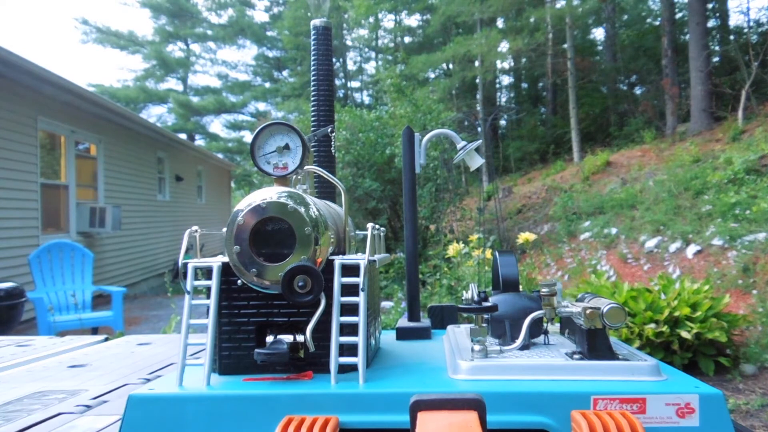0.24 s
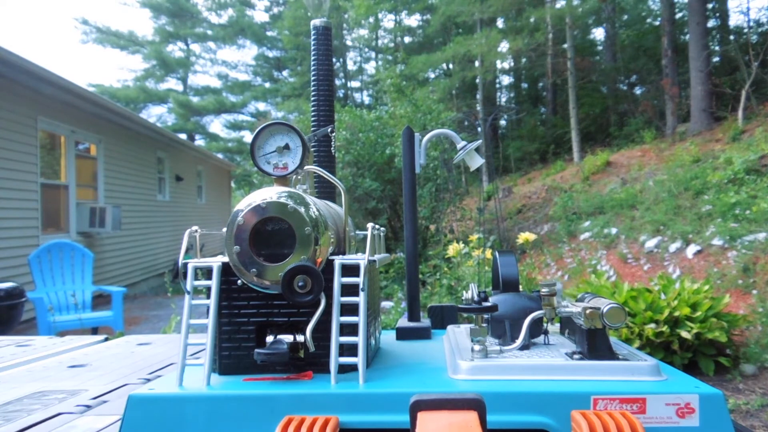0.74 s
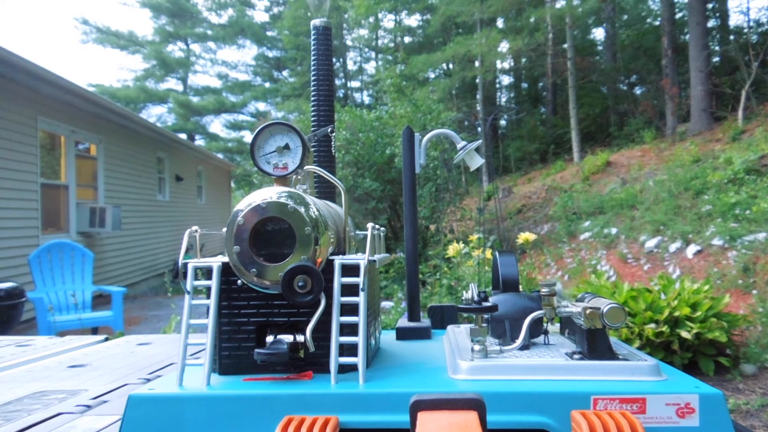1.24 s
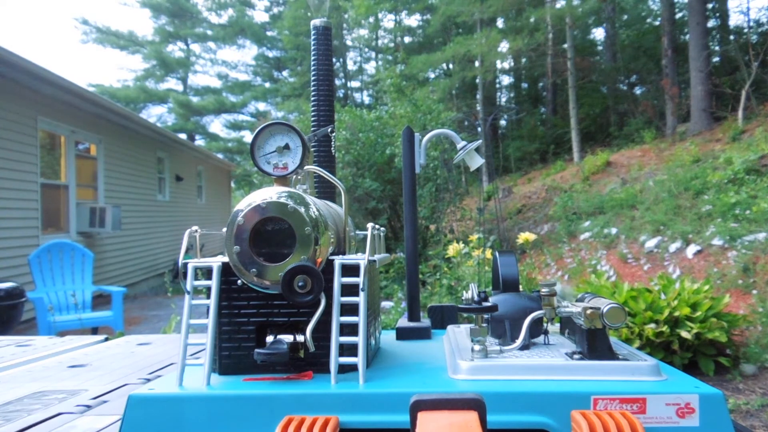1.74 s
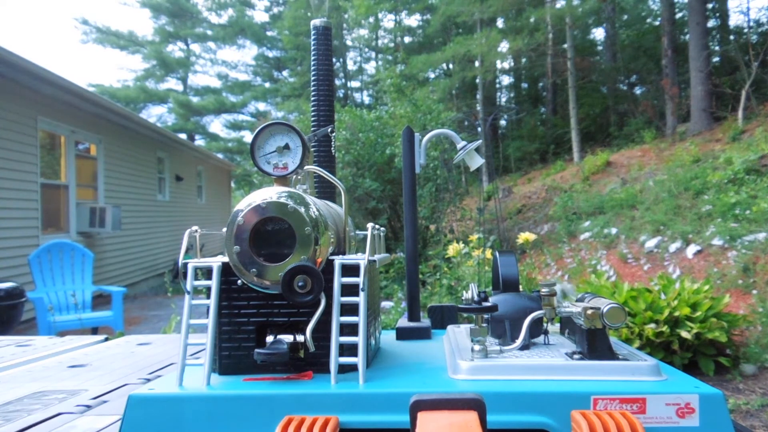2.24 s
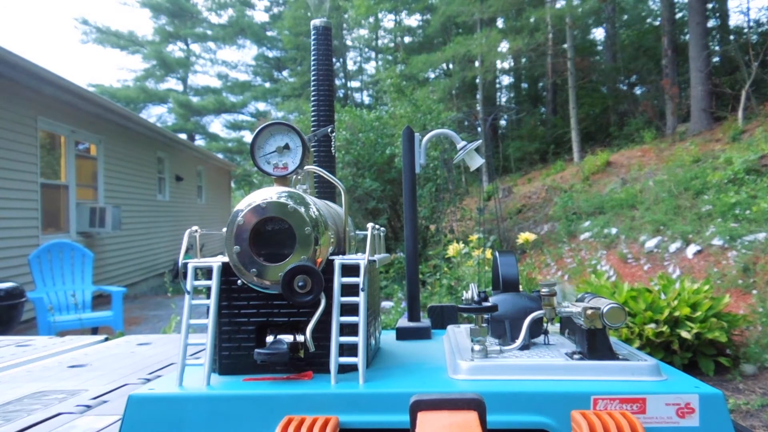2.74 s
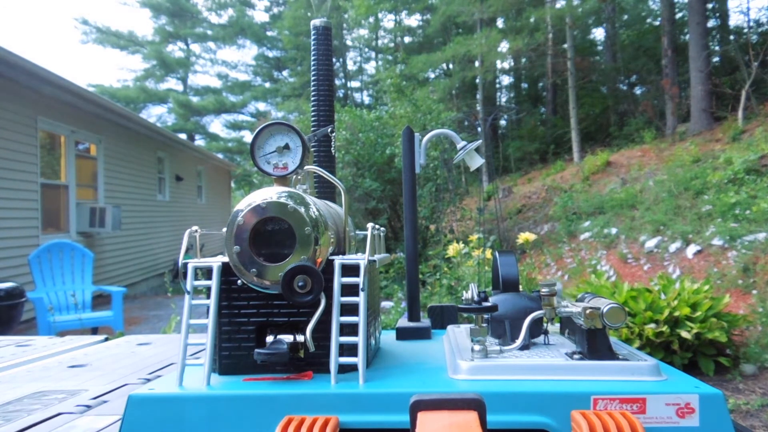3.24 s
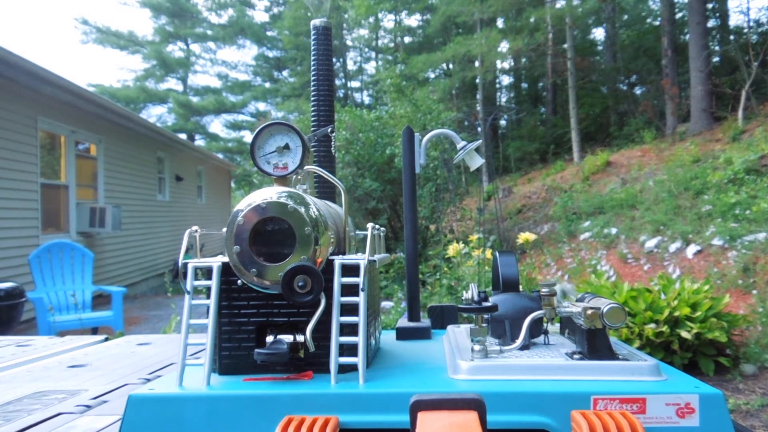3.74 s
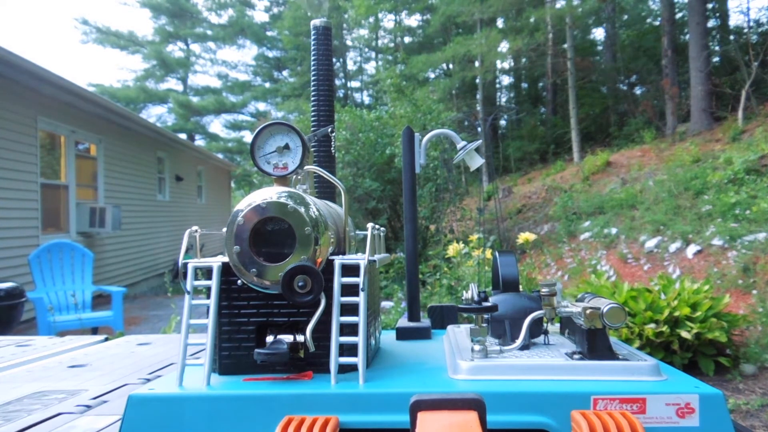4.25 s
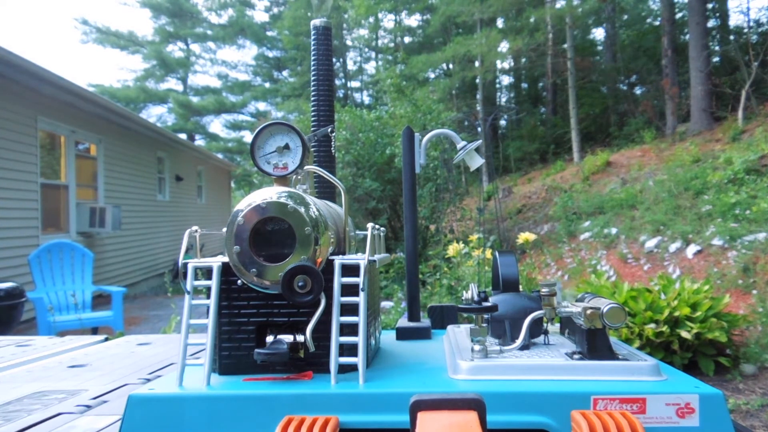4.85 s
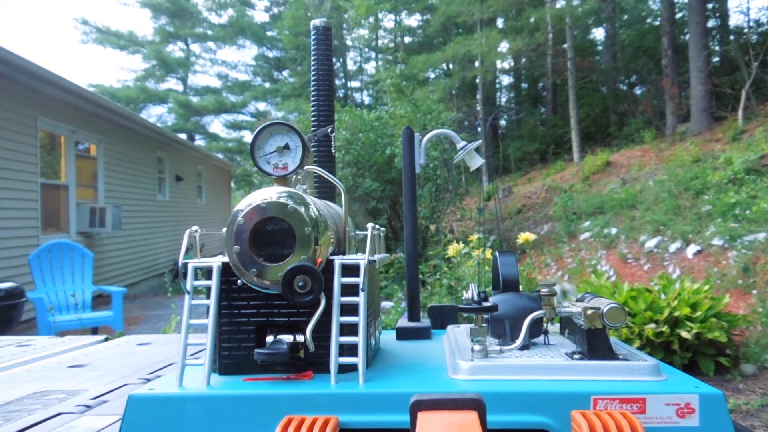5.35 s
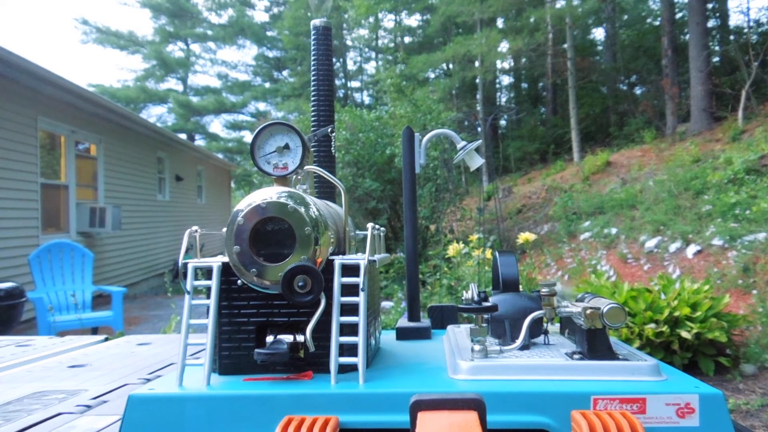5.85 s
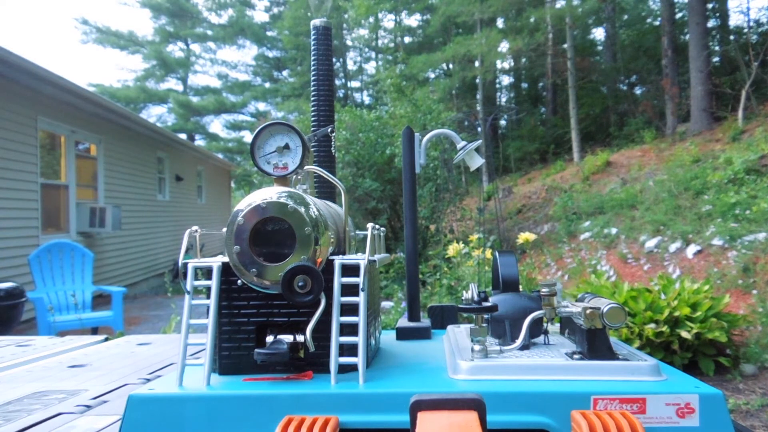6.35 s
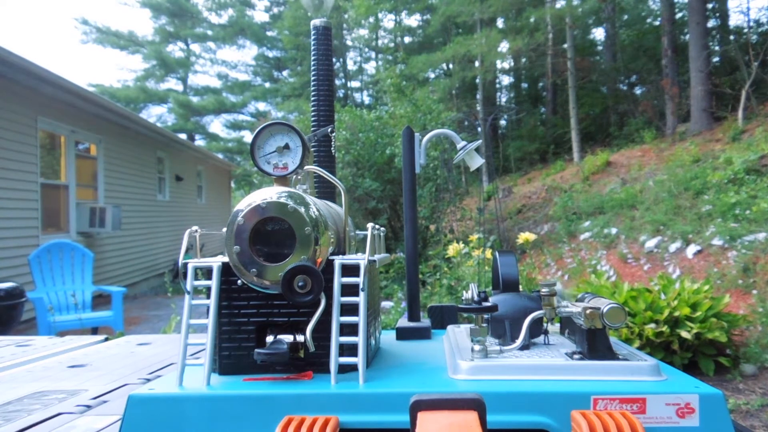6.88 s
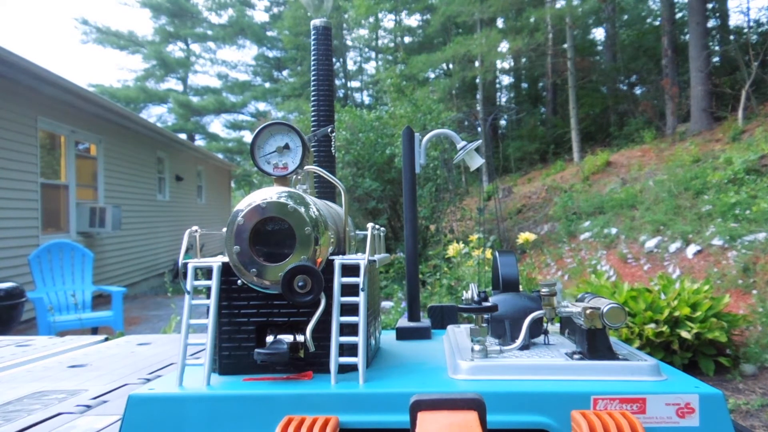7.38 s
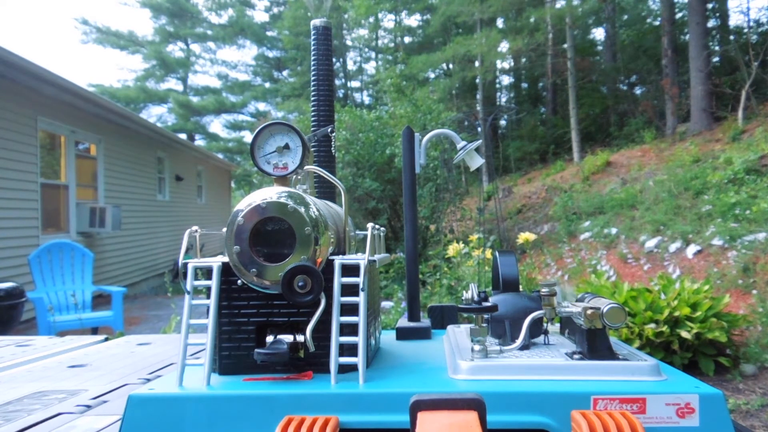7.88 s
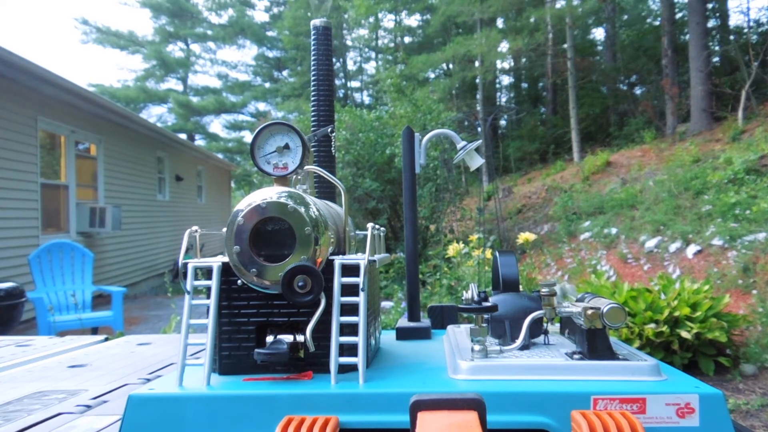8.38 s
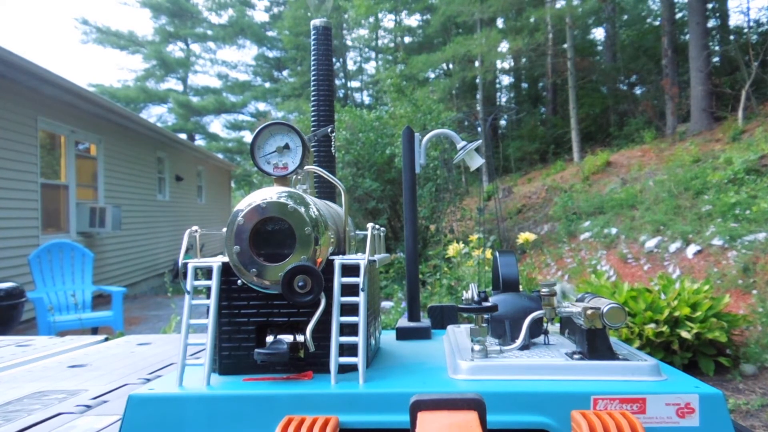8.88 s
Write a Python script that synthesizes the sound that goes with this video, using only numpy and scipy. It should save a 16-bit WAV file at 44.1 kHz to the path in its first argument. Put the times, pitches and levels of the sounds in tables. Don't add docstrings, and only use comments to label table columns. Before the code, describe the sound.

A small tabletop steam engine chatters rapidly outdoors, bright metal knocks over rattling linkage and steam hiss, slowing slightly and becoming uneven.

```python
import sys
import numpy as np
from scipy import signal
from scipy.fft import rfft, irfft, next_fast_len
from scipy.io import wavfile
from scipy.ndimage import uniform_filter1d

SR = 44100
rng = np.random.default_rng(int(sys.argv[2]) if len(sys.argv) > 2 else 0)


def master(y):
    cut = np.clip(np.atleast_2d(y).T, -1, 1)
    pcm = np.round(cut * 32767)
    wavfile.write(sys.argv[1], SR, pcm.astype(np.int16))


def rack_gain(trim_db):
    fader = np.asarray(trim_db, float)
    return 10 ** (fader / 20)


N = 402191

# time_s, speed_turns_per_s
SPEED = [(0, 18.039), (1.01, 17.789), (2.03, 17.634), (3.04, 17.338), (4.05, 17.001), (5.07, 16.692),
         (6.08, 16.497), (7.09, 16.463), (8.11, 16.329), (9.12, 16.231)]
MEAN_SPEED = 17
# pitch_hz, side_share
APART = [(30, .5), (130, .34), (400, .18), (1000, .055), (2000, .06), (4000, .1), (7000, .12), (9500, .4),
         (14000, .36)]


def crankshaft():
    first_turn = .232
    phase = np.cumsum(curve(SPEED, 1)) / SR - first_turn
    whole_turns = np.arange(int(phase[-1]) + 1)
    return phase, np.interp(whole_turns, phase, np.arange(N) / SR)


def contact(crank):
    # time_s, knock_db, treble_minus_knock_db, return_knock_db
    slack = np.array([(0, -27, 0, -41), (.5, -28, 1, -42.5), (1.35, -28.2, -.4, -39.5),
                      (1.7, -28, 0.5, -43), (2.3, -28.5, -1, -43), (2.8, -30, 2, -42.5), (3.3, -29, 1, -44),
                      (4.2, -29, 1.5, -40), (4.7, -28, -4, -44), (4.85, -32.5, -16, -43),
                      (5.1, -31.5, -4.5, -39.5), (5.25, -30, -3.5, -41), (5.95, -29, -2.5, -40),
                      (6.4, -29, 0, -41), (7.2, -27.5, -2, -40.5), (8.1, -28, 0, -39.5),
                      (8.7, -28.5, 1, -42.5), (9.12, -27.5, -0.5, -37)])
    # time_s, knock_db, treble_minus_knock_db
    cushioned = [(2.091, -28, -4.5), (2.148, -28.5, -2.5), (2.376, -28.5, -3), (3.006, -32.5, 1),
                 (3.064, -28, -10), (3.121, -31.5, -11), (3.18, -32.5, -12), (3.411, -32.5, -2.5),
                 (3.469, -32, -11), (3.527, -29.5, -13), (3.585, -30.5, -12), (3.644, -33, -2.5),
                 (3.702, -29, -12), (3.761, -33, -7), (3.82, -31.5, -8), (3.936, -31.5, -5),
                 (4.408, -35.5, -15), (4.468, -31, -4), (4.588, -37, -7), (5.482, -35, -2.5),
                 (5.543, -28.5, -14), (5.604, -30, -6), (5.664, -28.5, -4.5), (6.087, -31.5, -13),
                 (6.33, -28.5, -7), (6.39, -29.5, -3), (6.45, -34.5, -11), (8.586, -38, -16),
                 (8.647, -31, -13)]
    # time_s, knock_db, treble_minus_knock_db
    bare = [(.013, -32.5, 6.5), (.179, -28.5, 2), (.681, -28.5, 1.5), (2.204, -29, 3.5), (2.261, -29, 3),
            (2.546, -28.5, 2.5), (2.661, -28, 0.5), (2.719, -29.5, 3.5), (2.834, -27, 4), (2.891, -26, 3.5),
            (2.949, -27, 2), (3.238, -30, 1.5), (3.878, -27.5, 0.5), (3.994, -28, -0.5), (4.527, -27, -2.5),
            (4.645, -29.5, -1.5), (5.362, -30, -1), (5.423, -27, -3), (5.725, -29.5, 0), (6.149, -28, -.2),
            (6.269, -28, -1), (7.728, -29, 2), (7.85, -28.4, 2), (8.525, -27.5, 2)]
    trend = np.array([np.interp(crank, slack[:, 0], column) for column in slack.T[1:]])
    scatter_db = [.5, .9, 1.1]
    db = trend + (rng.standard_normal((len(crank), 3)) * scatter_db).T
    for s, knock_db, treble_db in cushioned + bare:
        db[:2, np.argmin(abs(crank - s))] = knock_db, treble_db
    db[2] += 0.35 * (db[0] - trend[0])
    return db


def main_knock(start, knock_db, treble_db):
    # pitch_hz, level_db, t60_s, build_up_ms
    frame = [(1497, -21.5, 0.037, 0.2), (1795, -7.1, 0.045, 3.0), (1932, -0.6, 0.023, 3.0),
             (2119, -7, 0.026, 1.8), (2562, -14, 0.025, 1.0), (2902, -4, 0.022, 2.0),
             (3077, -2.5, 0.032, 3.0), (3249, -13.5, 0.04, 0.2), (3512, -5.6, 0.023, 3.0),
             (3876, -5, 0.031, 2.5), (4130, -7, 0.02, 2.0), (4509, -5, 0.016, 2.0),
             (4907, -14.3, 0.015, 1.4), (6046, -15.5, 0.015, 2.7), (6669, -12.8, 0.015, 1.4),
             (7680, -13.6, 0.015, 0.9), (8307, -11.1, 0.015, 1.4), (9102, -16.7, 0.025, 1.0),
             (9771, -9.1, 0.015, 1.7), (10032, -19.9, 0.025, 0.2), (10307, -17.8, 0.015, 0.3),
             (10783, -6.8, 0.017, 1.1), (10878, -4.7, 0.02, 3.0), (11560, -0.9, 0.019, 3.0),
             (11951, -8.8, 0.015, 0.5), (12277, -6.0, 0.022, 0.4), (12491, -4.3, 0.018, 0.4),
             (12819, -1.5, 0.015, 1.6), (13278, -13.4, 0.015, 0.2), (13665, -13.8, 0.015, 0.5)]
    ringing = rack_gain(5.5) * knock(start, knock_db, treble_db + 0.5, frame, scatter_db=1.45, slip=0.44)
    cracking = rack_gain(3.5) * crack(start, knock_db, treble_db, t60=0.038, rise_ms=1.45)
    return ringing + cracking + rack_gain(-6.0) * tick(start, knock_db + treble_db)


def return_knock(back, return_db):
    # pitch_hz, level_db, t60_s, build_up_ms
    soft_frame = [(1510, -17.1, 0.036, 0.5), (1919, 0.0, 0.022, 3.0), (2142, -6.8, 0.027, 0.5),
                  (2579, -10.6, 0.025, 0.5), (2905, -6.4, 0.023, 0.2), (3078, -4.1, 0.04, 3.0),
                  (3252, -13.0, 0.046, 0.5), (3509, -6.6, 0.023, 3.0), (3885, -9.2, 0.03, 3.0),
                  (4500, -17.3, 0.023, 0.6), (6082, -8.3, 0.016, 3.0), (6649, -16.3, 0.015, 0.4),
                  (7618, -20.6, 0.015, 0.5), (8398, -19.7, 0.015, 1.4), (10938, -15.7, 0.015, 0.5),
                  (11554, -14.4, 0.015, 2.2)]
    even = np.zeros(len(back))
    ringing = rack_gain(10.5) * knock(back, return_db, even, soft_frame, scatter_db=2.3, slip=0.94)
    cracking = rack_gain(10.0) * crack(back, return_db, even - 8, t60=0.014, rise_ms=0.55)
    return ringing + cracking + rack_gain(-16) * tick(back, return_db)


def knock(seconds, db, treble_db, modes, scatter_db, slip):
    out = 0
    for hz, mode_db, t60, rise_ms in modes:
        bright_db = np.clip((hz - 3300) / 5000, 0, 1) * treble_db
        chance = rng.standard_normal((len(seconds), 2)).T
        strength = rack_gain(db + mode_db + bright_db + scatter_db * chance[0])
        sizes = strength * np.exp(1j * slip * chance[1])
        out = out + ring(clicks(seconds, sizes), hz, t60, rise_ms)
    return out


def crack(seconds, db, treble_db, t60, rise_ms):
    # pitch_hz, level_db_per_hz
    small_modes = [(900, -29), (1500, -42), (2500, 5), (4500, -5), (5600, -9), (8000, -4), (10000, -6),
                   (12500, 8), (13800, -18), (14300, -14)]
    noise = hiss(small_modes)
    treble = signal.sosfilt(signal.butter(1, 5000, "high", fs=SR, output="sos"), noise)
    body = signal.sosfilt(signal.butter(1, 5000, fs=SR, output="sos"), noise)
    body_fade = swell(clicks(seconds, rack_gain(db)), 0, t60, rise_ms).real
    treble_hits = clicks(seconds, rack_gain(db + treble_db - 3.0))
    treble_fade = swell(treble_hits, 0, t60 * .6, rise_ms * .6).real
    return body * body_fade + treble * treble_fade


def tick(seconds, db):
    band = signal.butter(3, [5500, 13600], "band", fs=SR, output="sos")
    mid, side = signal.sosfilt(band, rng.standard_normal((2, N)))
    both = mid + 0.31 * side * np.array([[1], [-1]])
    return both * swell(clicks(seconds + 0.0002, rack_gain(db)), 0, t60=0.0056, rise_ms=.25).real


def table_thud(crank):
    # pitch_hz, t60_s, level_db, db_per_turn_per_s, extra_db_while_rocking
    modes = [(162.5, 0.065, -68.5, 0.5, -4), (225, 0.041, -60.5, 0, -7.5), (274, 0.073, -62, -0.5, 4),
             (411, 0.05, -58, 1, 0), (535.6, 0.072, -61, 4, 0.5)]
    rock_speed, rock_width = 17.05, 0.39
    stagger_s = .012
    out, speed = 0, curve(SPEED, 1)
    rocking = np.exp(-((speed - rock_speed) / rock_width) ** 2)
    for k, (hz, t60, db, per_speed, rock_db) in enumerate(modes[::-1]):
        push = clicks(crank + k * stagger_s, rack_gain(0.3 * rng.standard_normal(len(crank))))
        thud = unit(ring(push, hz, t60, rise_ms=5))
        out = out + thud * rack_gain(db + per_speed * (speed - MEAN_SPEED) + rock_db * rocking)
    return out * rack_gain(np.array([[0.], [-1.6]]))


def exhaust(start, length):
    # share_of_turn, pitch_hz, level_db
    puffs = [
        (.31, 290, 0),
        (.82, 230, -1),
        (.17, 330, -6),
        (.6, 300, -7),
    ]
    out = 0
    for share, hz, db in puffs:
        train = clicks(start + share * length, rack_gain(db + 0.84 * rng.standard_normal(len(start)))).real
        cycles = np.arange(-SR // 100, SR // 100) / SR * hz
        swing = np.sin(2 * np.pi * cycles) * np.exp(-(cycles / .5) ** 2)
        out = out + signal.fftconvolve(train, swing, "same")
    return unit(out) * rack_gain(-61 + np.array([[.9], [-.9]]))


def stroke_motion(phase):
    return rack_gain(1.7 * np.cos(4 * np.pi * (phase - .1)) + 2.0 * np.cos(2 * np.pi * (phase - .2)))


def linkage_rattle(busy, faster):
    # pitch_hz, level_db, t60_s
    tin_base = [(1030, -15.5, 0.062), (1250, -11.5, 0.04), (1486, -8, 0.021), (1775, -5.5, 0.078),
                (1860, -2.5, 0.034), (1974, -3, 0.026), (2062, -3, 0.027), (2238, -4.5, 0.026),
                (2707, -10, 0.025), (3090, -27, 0.027), (3147, -10, 0.043), (3800, -12, .03)]
    hits = (rng.random(N) < 1500 / SR) * rng.choice([-1, 1], N)
    ticks = hits * rack_gain(np.minimum(2.0 * rng.exponential(size=N), 12))
    base = sum(ring(rack_gain(db + 3.0 * walk(12)) * busy * ticks, hz, t60) for hz, db, t60 in tin_base)
    return unit(base) * rack_gain(-43.5 + 1.2 * faster + .5 * walk(2.25))


def linkage_rub(busy, faster):
    # pitch_hz, level_db_per_hz
    rough = [(300, -10), (700, -14), (1000, 1), (1400, 3), (2400, 0.5), (3500, -9), (5000, -10.5),
             (8000, -35.5)]
    return hiss(rough) * busy ** 0.5 * rack_gain(-45 + 1.45 * faster + 0.8 * walk(25))


def steam_hiss(busy, faster):
    # pitch_hz, level_db_per_hz
    leak = [(2500, -28), (4000, -5), (5600, -9), (6600, -1.5), (8700, -6.5), (10200, 3.5), (11500, 2),
            (12600, 1), (13500, -5.5), (14200, 2.5)]
    return hiss(leak) * busy ** 0.48 * rack_gain(-49 + 0.3 * faster + 1.05 * walk(23))


def strays():
    # start_s, level_db, pitch_hz
    loose_part = [
        (2.2097, -28.5, 1250),
        (3.703, -33, 1460),
        (4.652, -31, 1110),
        (8.514, -37, 1070),
    ]
    # start_s, level_db
    drops = [
        (2.395, -41),
        (4.6377, -50),
        (4.6564, -42),
        (5.4145, -37),
    ]
    clinks = 0
    for s, clink_db, hz in loose_part:
        clinks = clinks + ring(clicks(np.array([s]), rack_gain(clink_db + 6)), hz, 0.017, rise_ms=0.54)
    seconds, db = np.transpose(drops)
    return clinks + crack(seconds, db + 10.0, 0 * db + 8, t60=0.012, rise_ms=.2)


def bird():
    start_s, length_s, pitch_hz, rise_hz = 4.965, .078, 4205, 130
    u = np.clip((np.arange(N) / SR - start_s) / length_s, 0, 1)
    tone = np.sin(2 * np.pi * np.cumsum(pitch_hz + rise_hz * u) / SR)
    return tone * np.sqrt(np.sin(np.pi * u).clip(0)) * rack_gain(-53)


def far_motor():
    # middle_s, half_length_s, extra_db
    breeze = [
        (3.35, .3, 4),
        (4.102, .35, 8),
        (4.78, 0.1, 9),
    ]
    t = np.arange(N) / SR
    db = -64 + sum(more_db * np.exp(-((t - s) / half) ** 2) for s, half, more_db in breeze)
    hum = hiss([(60, -40), (90, -16), (102, 0), (115, -10), (170, -34.5)])
    return hum * rack_gain(db - np.array([[1.5], [4.5]]))


def garden_air():
    # pitch_hz, level_db_per_hz
    murmur = [(15, -10), (30, -8), (42, -16), (60, -6), (80, -13), (150, -11), (280, -9), (410, -5),
              (550, -8), (800, -4.5), (1100, -11), (1600, -40)]
    return hiss(murmur) * rack_gain(-54.5 + np.array([[1.3], [-1.3]]) + 0.67 * walk(2.94))


def swell(force, hz, t60, rise_ms):
    pole = np.exp(2j * np.pi * hz / SR - np.log(1000) / (np.clip(t60, .004, .06) * SR))
    fast = pole * np.exp(-1000 / (max(rise_ms, .05) * SR))
    return signal.lfilter([pole - fast], np.convolve([1, -pole], [1, -fast]), force)


def ring(force, hz, t60, rise_ms=0.97):
    gap = np.arctan(on_log(APART, hz)) * rng.choice([-1, 1]) * np.array([[1], [-1]])
    return np.imag(swell(force, hz, t60, rise_ms) * np.exp(1j * (gap + 2 * np.pi * rng.random())))


def clicks(seconds, sizes):
    out = np.zeros(N, complex)
    np.add.at(out, np.clip((seconds * SR).astype(int), 0, N - 1), sizes)
    return out


def hiss(spectrum):
    size = next_fast_len(N)
    hz = np.fft.rfftfreq(size, 1 / SR)
    mid, side = rfft(rng.standard_normal((2, size)))
    both = mid + np.array([[1], [-1]]) * on_log(APART, hz) * side
    coloured = both * rack_gain(on_log(spectrum, hz)) * (hz < 14250)
    return unit(irfft(coloured, size)[:, :N])


def walk(rate):
    k = int(SR / rate)
    steps = np.repeat(rng.standard_normal(N // k + 1), k)
    return 1.2 * uniform_filter1d(uniform_filter1d(steps, k), k)[:N]


def curve(rows, column):
    rows = np.array(rows)
    return np.interp(np.arange(N) / SR, rows[:, 0], rows[:, column])


def on_log(rows, hz):
    rows = np.array(rows)
    return np.interp(np.log(np.maximum(hz, 1)), np.log(rows[:, 0]), rows[:, 1])


def unit(x):
    return x / np.sqrt(np.mean(x ** 2))


def scene():
    phase, crank = crankshaft()
    length = np.gradient(crank)
    faster = curve(SPEED, 1) - MEAN_SPEED
    knock_db, treble_db, return_db = contact(crank)
    start = crank + .00015 * rng.standard_normal(len(crank))
    back = crank + .495 * length
    blows = main_knock(start, knock_db, treble_db) + return_knock(back, return_db)
    beat = table_thud(crank) + exhaust(crank, length)
    busy = stroke_motion(phase)
    metal = blows + linkage_rattle(busy, faster) + linkage_rub(busy, faster)
    engine = metal * rack_gain(np.array([[.15], [-.15]])) + beat + strays() + steam_hiss(busy, faster)
    return engine + bird() + far_motor() + garden_air()


def roll_off(x):
    return signal.sosfilt(signal.butter(12, 15500, fs=SR, output="sos"), x)


def record(dry):
    mix = signal.sosfilt(signal.butter(6, 14600, fs=SR, output="sos"), dry)
    return roll_off(mix)


dry = scene()
out = record(dry)
master(out)
```